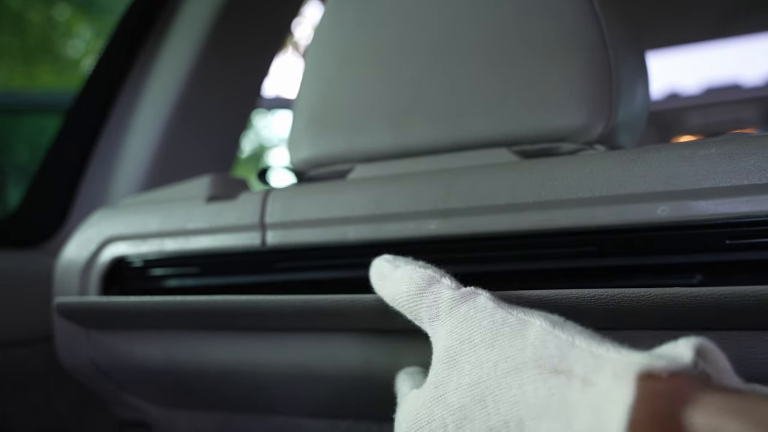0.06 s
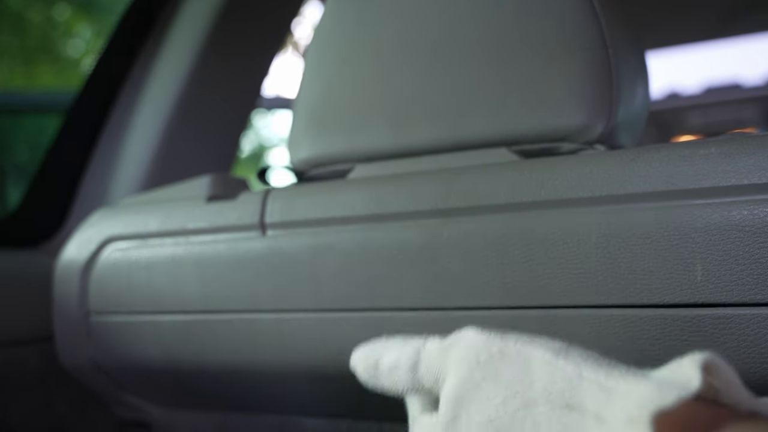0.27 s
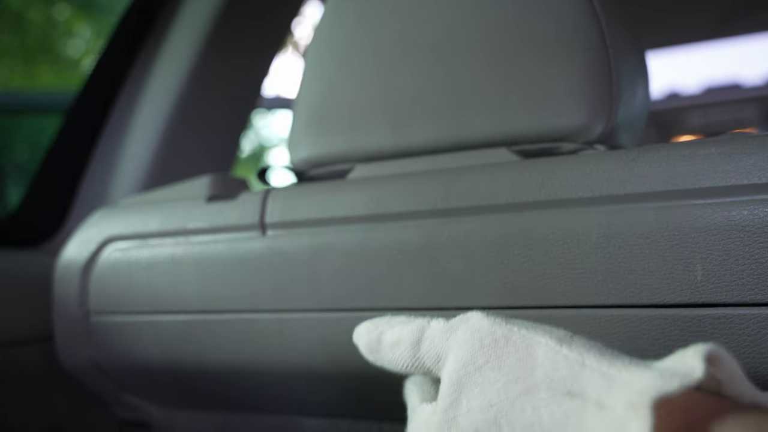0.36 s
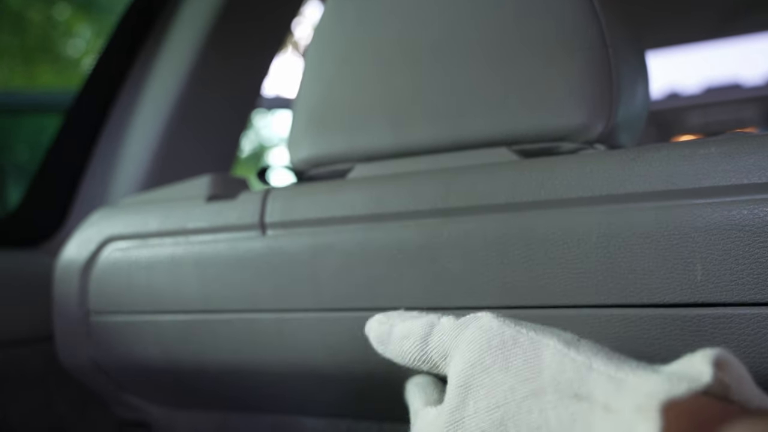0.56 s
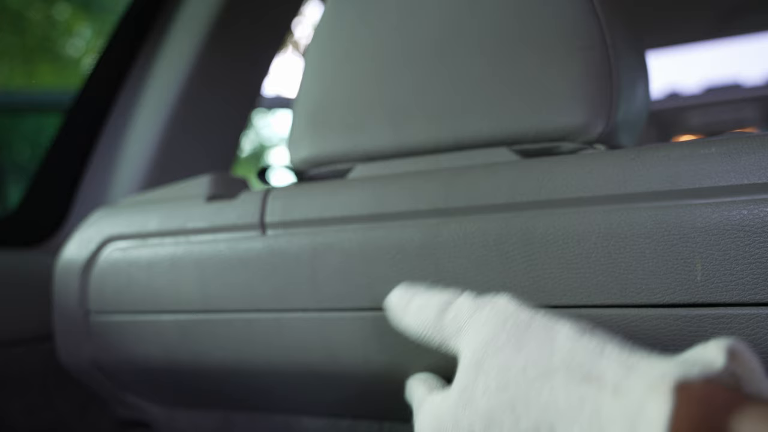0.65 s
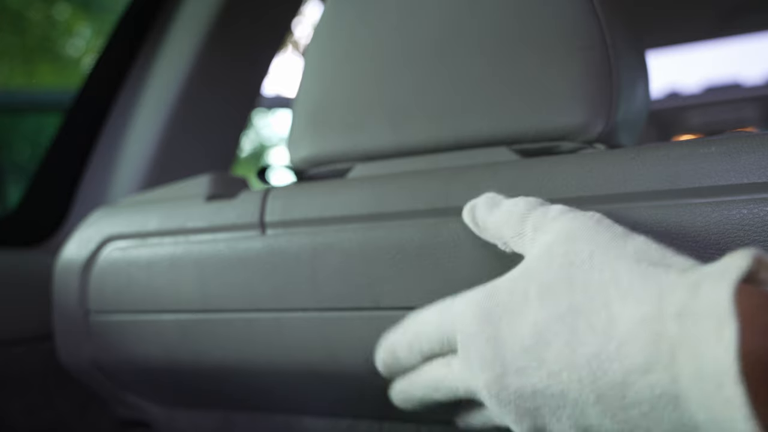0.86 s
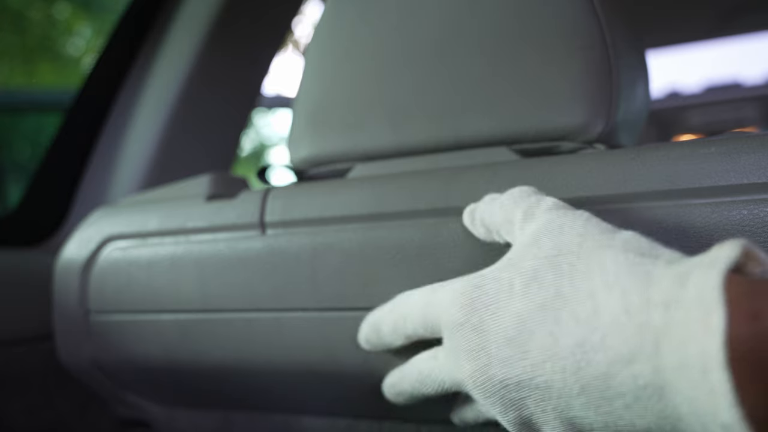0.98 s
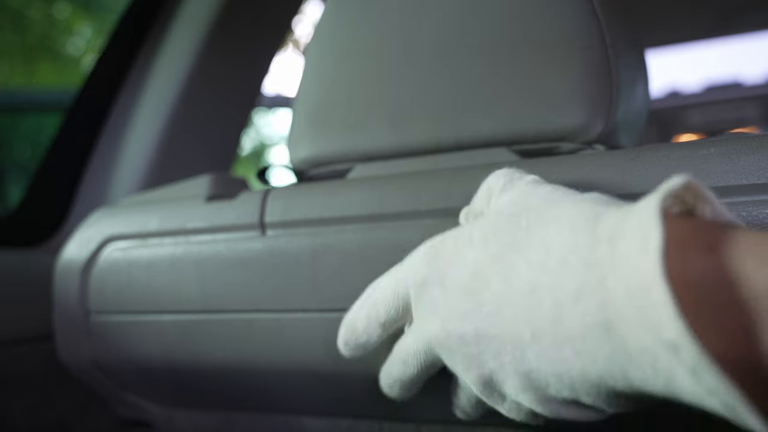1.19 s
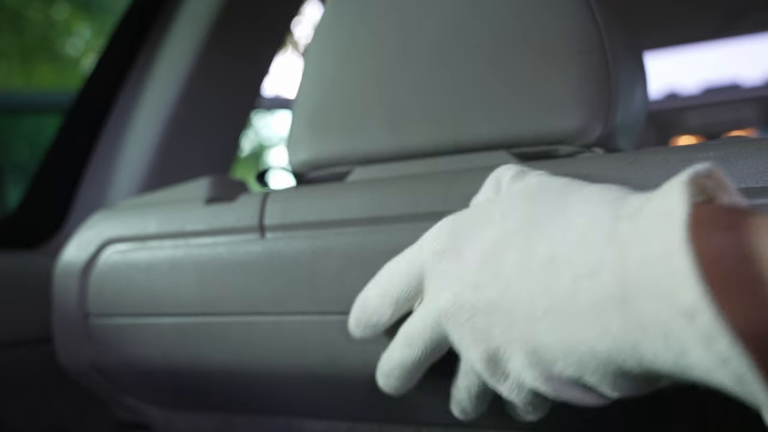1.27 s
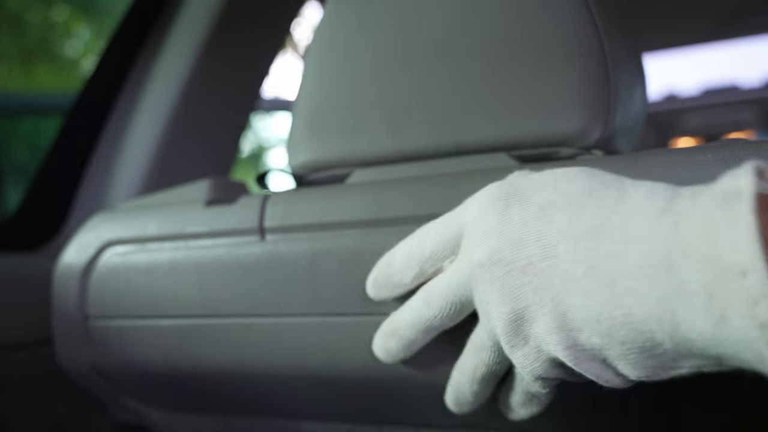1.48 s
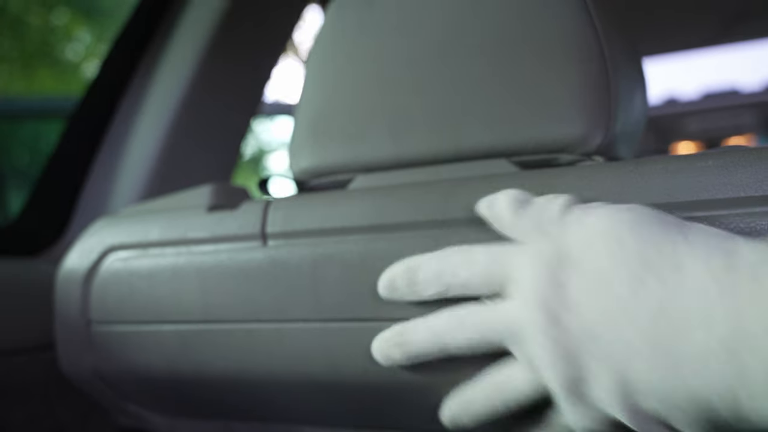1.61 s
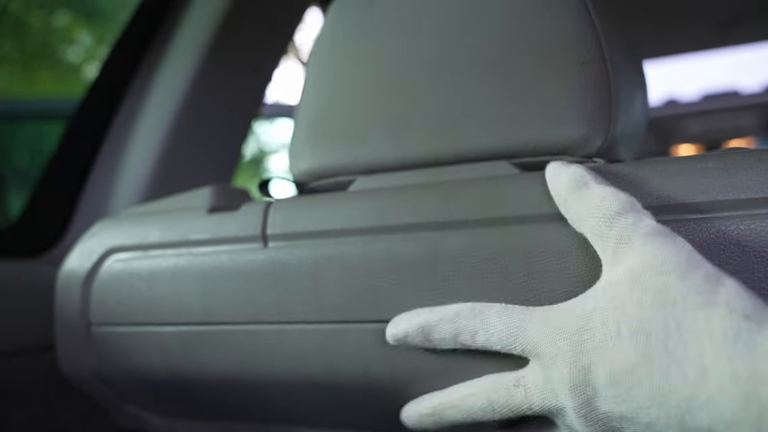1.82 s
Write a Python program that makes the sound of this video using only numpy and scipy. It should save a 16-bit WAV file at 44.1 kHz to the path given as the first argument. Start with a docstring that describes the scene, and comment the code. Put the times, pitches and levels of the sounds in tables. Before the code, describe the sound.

A plastic lid slams shut inside a car, followed by faint ticks of handled trim.

```python
"""Shutting a plastic lid in a car

Inside a parked car a gloved hand pushes a plastic panel lid shut: the latch rides over its catch,
the lid slams and shudders, and a spring rings on. The hand then presses and strokes the trim, which
sticks and slips in short dry ticks. A low rumble fills the cabin, and the cabin air booms as the
hand pushes and lets go. The close microphone overloads on the slam."""
import sys
import numpy as np
from scipy.fft import rfft, irfft, next_fast_len
from scipy.io import wavfile
from scipy.ndimage import uniform_filter1d, map_coordinates

SR = 44100
rng = np.random.default_rng(int(sys.argv[2]) if len(sys.argv) > 2 else 0)


def store_wav(level_fs):
    """Save 16-bit WAV to argv[1]."""
    pcm = np.round(np.clip(np.atleast_2d(level_fs), -1, 1) * 32767)
    wavfile.write(sys.argv[1], SR, pcm.T.astype(np.int16))


N = 81585

# How strong each noise is from low to high pitch: pitch_hz, relative_db
RUMBLE_COLOUR = [(12, -49), (20, -34.5), (44, -4), (180, 0), (362, -9.5), (439, -13), (705, -13.5),
                 (767, -8.5), (881, -10.5), (1580, -17.5), (2090, -22), (2270, -25.5), (15500, -59.5)]
ECHO_COLOUR = [(30, -9), (100, 8.5), (250, -3.5), (600, -18), (1500, -20), (4000, -25), (7000, -34.5),
               (15000, -39)]
RUB_COLOUR = [(40, -18), (110, 7), (300, 4.5), (600, -2), (1100, -7), (2400, -15), (4200, -22.5),
              (7000, -32.5), (15000, -42)]
HISS_COLOUR = [(500, -14), (2000, 4.5), (4000, 5), (8000, -4.5), (13000, -2.5), (16000, -5.5)]
TRIM_COLOUR = [(50, -31), (150, -3.5), (300, 6), (520, 5.5), (660, -2.5), (1000, 0.5), (1500, -1.5),
               (2050, -4.5), (2400, -3), (3000, -9.5), (3900, -4.5), (4700, -11), (5300, -11.5),
               (6600, -15), (7900, -15.5), (10000, -21), (15000, -29)]
LID_COLOUR = [(30, -18.5), (120, -7), (300, 0.5), (650, 6), (1300, -0.5), (2400, -5.5), (4200, -5.5),
              (6500, -12), (9500, -19.5), (14000, -18.5)]
SHUDDER_COLOUR = [(35, -29), (80, -14), (180, -10), (290, 0.5), (380, -7.5), (470, -1), (660, -14.5),
                  (830, 1.5), (1300, -17.5), (2250, -11.5), (2950, -21.5), (3800, -12.5), (5000, -26),
                  (15500, -48.5)]
# How long a noise takes to die away (a fade time is a drop of 60 dB): pitch_hz, fade_s
ECHO_FADES = [(100, 0.9), (1000, 1), (4000, 1), (12000, 0.31)]
TRIM_FADES = [(150, 0.087), (500, 0.069), (2000, 0.055), (5000, 0.031), (12000, 0.023)]
LID_FADES = [(100, 0.039), (600, 0.043), (3000, 0.071), (8000, .046), (15000, .037)]
# The tones each thing rings with when knocked: pitch_hz, relative_db, fade_s
AIR_TONES = [(110, -18.5, 0.13), (96.2, -38.5, .9), (119.5, -41, .8)]
FINGERTIP_TONES = [(213, -41.5, 0.08), (760, -35, 0.064), (1227, -46, 0.2)]
TRIM_TONES = [(244, -12.5, 0.094), (300, -11, 0.1), (419, -11, 0.044), (557, -12.5, 0.04),
              (745, -12, 0.062), (1025, -4, 0.027), (2415, -12.5, 0.042), (5196, -12, 0.027),
              (6140, -23, 0.029)]
HINGE_TONES = [(357, -33, 0.042), (900, -41.5, 0.06), (2580, -27, 0.013), (3794, -26, 0.04),
               (10640, -60, 0.075)]
SPRING_TONES = [(361, -34, 1.4), (721, -54, 1.4), (845, -49, .75), (1432, -55, 1.1), (1712, -54, 1.1),
                (2143, -51, 1.1), (2195, -51, .8), (3246, -46, .6)]
CATCH_TONES = [(294, -14, 0.15), (850, -18.5, 0.069), (968, -7, 0.032), (2262, -10, 0.055),
               (6180, -24.5, 0.057)]
LID_TONES = [(275, -17, .15), (306, -27, .14), (452, -33, .15), (555, -25, .14), (750, -24, .12),
             (834, -28, .19), (1040, -31, .14), (1161, -31, .16), (1389, -29, .12), (1561, -31, .16),
             (2291, -29, .13), (2461, -30, .12), (3850, -29, .09), (6205, -29, .075)]
# Booms of the cabin air: start_s, level_db
BOOMS = [(0.263, -0.5), (0.617, -15.5), (1.583, -5)]
# How loud the glove rubs and hisses over time: time_s, level_db
RUB_LEVELS = [(.77, -52), (.94, -52.5), (1.06, -40.5), (1.13, -43), (1.24, -37.5), (1.34, -41),
              (1.41, -48.5), (1.48, -39), (1.55, -42.5), (1.6, -32.5), (1.64, -35.5), (1.67, -35.5),
              (1.73, -46.5), (1.8, -38), (1.85, -45)]
HISS_LEVELS = [(.77, -73), (.795, -54.5), (.825, -51), (.86, -62), (.95, -64), (1.15, -103), (1.32, -70),
               (1.42, -67), (1.58, -69), (1.67, -47.5), (1.72, -52), (1.78, -51.5), (1.85, -53.5)]
# Slips of the trim's edge: start_s, relative_db, bass_db, treble_db, edge_pitch_hz, edge_db
TICKS = [(0.001, -35.5, -29, 4.5, 3830, -15), (0.7855, -39.5, 4, -2.5, 3880, -17),
         (0.9638, -35, -5, -11, 3590, -5), (0.9753, -36.5, 7, 7, 2680, 0), (0.997, -43, 1, 7, 3800, -2),
         (1.03, -27.5, -26, 3, 2640, -0.5), (1.053, -40.5, 4, -19, 2420, -8),
         (1.0673, -28.5, -6.5, -11.5, 3570, -14), (1.098, -33, 2, -3, 3540, -6),
         (1.108, -32.5, -0.5, 4.5, 3600, -3), (1.133, -43.5, 8, -13, 2660, -8),
         (1.156, -31, 5, 1.5, 3760, -16), (1.161, -26, 2.5, -6.5, 3750, -5),
         (1.184, -46, 4.5, -5, 2610, -8), (1.215, -35.5, -12, 2, 3780, -5),
         (1.22, -27.5, -8, -4.5, 3800, -14), (1.253, -32.5, -12, -0.5, 3960, -10),
         (1.261, -26, -10, -5, 3870, -22), (1.268, -34, 8.5, -4, 2650, -8), (1.292, -29, 1, -1, 2540, -16),
         (1.314, -35.5, 4, -9, 3700, -11), (1.324, -27.5, -13, -3, 3730, 1),
         (1.344, -34.5, -7, -12, 3680, -2), (1.365, -27, -1, -2.5, 4010, -0.5),
         (1.371, -29, 7, -7, 3530, -7), (1.4631, -28, 0.5, 2, 3990, 2), (1.483, -33.5, -4, -3, 3960, -1),
         (1.4889, -33.5, -19, 5, 3860, -1), (1.506, -34.5, -27, -4, 3900, 0),
         (1.523, -32, -0.5, -2.5, 3970, -5), (1.573, -44, -9, -10, 4050, -11),
         (1.5783, -22.5, 2.5, 1, 4160, -15), (1.612, -42, -20, -19, 2650, -9),
         (1.623, -35, -23, -18, 3900, -11), (1.641, -36.5, -22, -10, 2730, 1),
         (1.645, -37, 2, -8, 4400, -6), (1.6838, -32, 0, -3.5, 3620, -2)]
# Tiny squeaks as the trim lets go: start_s, level_db, pitch_hz
SQUEAKS = [(1.029, -23, 6970), (1.094, -35, 7400), (1.1534, -33, 7300), (1.2134, -31, 7600),
           (1.2527, -31, 7800), (1.464, -30, 7940), (1.488, -32, 7800), (1.505, -38, 8000),
           (1.523, -35.5, 7700)]
# Latch and lid contacts: start_s, level_db, bass_db, treble_db, rise_s, stretch (of rise and fade)
CONTACTS = [(.162, -39, -5.5, -5.5, .0001, 0.64), (0.1932, -34.5, -7.5, -12.5, 0.0034, 1.3),
            (0.1996, -21, -16, -0.5, 0.0022, 1.18), (0.204, -16, -12.5, 7.5, .0003, 0.38),
            (0.2276, -14, -11.5, -3.5, 0.0048, 1.44), (0.2297, -10, -21, 10, .0001, 0.51),
            (.2325, -19, -15, 3.5, .0005, 2.05), (0.378, -42, 0, -10, 0.0051, 0.69),
            (0.423, -41.5, -30, -13, 0.0043, 1.6)]
# The lid slams, then settles softly into its seat: start_s, level_db, bass_db, rise_s
LID_BLOWS = [(0.2293, 0, -15.5, 0.00026), (0.2537, -7, 7.5, .004)]

SLAM_S = 0.2285
BASS_HZ, TREBLE_HZ = 610, 6000  # where bass ends and treble begins


def amp(db):
    """Turn decibels into a gain."""
    return 10 ** (np.asarray(db) / 20)


def unit(x):
    """Scale a signal to an average power of 1."""
    return x / np.sqrt(np.mean(x ** 2) + 1e-20)


def along(points, hz):
    """Read between (pitch_hz, value) rows on a log pitch scale."""
    pitches, values = np.transpose(points)
    return np.interp(np.log(hz + 1), np.log(pitches + 1), values)


def since(start_s):
    """Seconds since start_s, for every sample."""
    return np.arange(N) / SR - start_s


def curve(rows):
    """Join (time_s, value) rows with straight lines."""
    return np.interp(since(0), *np.transpose(rows))


def wobble(rate):
    """A smooth curve through `rate` random values a second."""
    return map_coordinates(rng.standard_normal(4096), [since(0) * rate], mode="wrap")


def filtered(x, gain):
    """Turn each frequency up or down by gain(hz)."""
    size = next_fast_len(len(x) + 2048)
    return irfft(rfft(x, size) * gain(np.fft.rfftfreq(size, 1 / SR)), size)[:len(x)]


def noise(colour, size=N):
    """Noise shaped by a colour table, at power 1."""
    return unit(filtered(rng.standard_normal(size), lambda hz: amp(along(colour, hz))))


def add(out, x, start_s):
    """Mix x into out from start_s on."""
    i = round(start_s * SR)
    x = x[max(-i, 0):N - i]
    out[max(i, 0):][:len(x)] += x


def ring(tones, t, rise_s=0.00028):
    """A knocked object rings with fading tones from t = 0."""
    t = np.maximum(t, 0)
    ringing = sum(amp(db - 60 * t / fade_s) * np.sin(2 * np.pi * hz * t) for hz, db, fade_s in tones)
    return (1 - np.exp(-t / rise_s)) * ringing


def pulse(t, peak_s):
    """One bump that reaches 1 at peak_s and falls away."""
    age = np.maximum(t, 0) / peak_s
    return age * np.exp(1 - age)


def dying(x, fades, t):
    """Fade each octave of x at its own speed after t = 0."""
    centres = np.geomspace(60, 15360, 9)
    spectrum, hz = rfft(x), np.fft.rfftfreq(len(x), 1 / SR)
    out = np.zeros(len(x))
    for centre, pick in zip(centres, np.eye(len(centres))):
        octave = irfft(spectrum * along(np.c_[centres, pick], hz), len(x))
        out += octave * amp(-60 * np.maximum(t, 0) / along(fades, centre))
    return out


def snap(colour, fades, t, bass_db, treble_db, rise_s):
    """Hit plastic rings with many short tones that blur into noise; hardness sets bass and treble."""
    def tone_control(hz):
        bass = 1 / (1 + (hz / BASS_HZ) ** 4)
        treble = 1 - 1 / (1 + (hz / TREBLE_HZ) ** 8)
        return amp(bass_db * bass + treble_db * treble)

    x = filtered(noise(colour, size=len(t)), tone_control)
    local_power = np.abs(uniform_filter1d(x ** 2, size=256)) + 1e-20
    steady = x * np.sqrt(np.mean(x ** 2) / local_power)
    return dying(steady, fades, t) * np.exp(np.minimum(t, 0) / rise_s)


def cabin_rumble(level_db=-48):
    """A low rumble that wavers slightly."""
    return amp(level_db + 0.42 * wobble(13)) * noise(RUMBLE_COLOUR)


def cabin_booms():
    """The cabin air booms as the hand pushes and lets go."""
    return sum(amp(db) * ring(AIR_TONES, since(start_s), rise_s=0.01) for start_s, db in BOOMS)


def cabin_echo(level_db=-32.5):
    """The slam lingers in the cabin as a low, fading noise."""
    t = np.arange(2 * SR) / SR - SLAM_S
    echo = dying(noise(ECHO_COLOUR, size=len(t)), ECHO_FADES, t) * (t > 0)
    return amp(level_db) * echo[:N]


def glove():
    """A fingertip lands softly; the cloth rubs the panel in rough grains and hisses as it slides."""
    fingertip = ring(FINGERTIP_TONES, since(0.785))
    fade_in = np.clip(since(RUB_LEVELS[0][0]) / 0.016, 0, 1)
    rub = amp(curve(RUB_LEVELS)) * unit(amp(2.5 * wobble(130)) * noise(RUB_COLOUR))
    hiss = amp(curve(HISS_LEVELS)) * unit(amp(1.3 * wobble(270)) * noise(HISS_COLOUR))
    return fingertip + fade_in * rub + hiss


def trim_creaks(boost_db=3, edge_fade_s=0.036):
    """Pressed trim sticks and slips; each slip ticks and knocks the panel, and some also squeak."""
    out, t = np.zeros(N), np.arange(-256, 7936) / SR
    for start_s, db, bass_db, treble_db, edge_hz, edge_db in TICKS:
        tick = snap(TRIM_COLOUR, TRIM_FADES, t, bass_db - 1, treble_db + 1, rise_s=0.0005)
        # no two slips ring quite alike
        panel_tones = [(hz * (1 + 0.014 * rng.normal()), tone_db + 2 * rng.normal(), fade_s)
                       for hz, tone_db, fade_s in TRIM_TONES]
        edge_tones = [(edge_hz * (1 + 0.022 * rng.normal()), edge_db, edge_fade_s) for _ in range(2)]
        panel = ring(panel_tones, t, rise_s=0.0015)
        edge = ring(edge_tones, t) / 2
        add(out, amp(db + boost_db) * (tick + edge + panel), start_s + t[0])
    for start_s, db, hz in SQUEAKS:
        squeak = pulse(t, peak_s=0.00028) * np.sin(2 * np.pi * hz * t)
        add(out, amp(db) * squeak, start_s + t[0])
    return out


def hinge():
    """The hinge clinks as the lid starts to move."""
    return ring(HINGE_TONES, since(0.00058))


def spring():
    """Shaken by the slam, a spring rings on."""
    return ring(SPRING_TONES, since(SLAM_S))


def latch():
    """The latch scrapes over its catch, clicks home and settles; every contact rings the catch."""
    out, t = np.zeros(N), np.arange(-2048, 10240) / SR
    for start_s, db, bass_db, treble_db, rise_s, stretch in CONTACTS:
        crack = snap(LID_COLOUR, LID_FADES, t / stretch, bass_db, treble_db, rise_s)
        add(out, amp(db) * (crack + ring(CATCH_TONES, t)), start_s + t[0])
    return out


def lid_shudder(level_db=-26, rise_s=0.006, hold_s=0.028, fade_s=0.044):
    """The shut lid chatters briefly against its seat."""
    t = since(0.252)
    swell = np.exp(np.minimum(t, 0) / rise_s)
    fade = amp(-60 * np.maximum(t - hold_s, 0) / fade_s)
    return amp(level_db + 0.6 * wobble(350)) * swell * fade * noise(SHUDDER_COLOUR)


def lid_knock(loose_hz=384, tight_hz=811, squeeze_s=0.004, rise_s=0.00083, fade_s=0.013):
    """The lid hits its frame with a dead knock whose pitch rises as the seal is squeezed."""
    t = since(SLAM_S)
    age = np.maximum(t, 0)
    pitch_hz = tight_hz + (loose_hz - tight_hz) * np.exp(-age / squeeze_s)
    loudness = amp(3.5 - 60 * age / fade_s) * (1 - np.exp(-age / rise_s))
    return loudness * np.sin(2 * np.pi * np.cumsum(pitch_hz * (t > 0)) / SR)


def lid_slam():
    """The lid knocks shut, squeezes a puff of air out of the gap and rings from each blow."""
    puff = amp(-7) * pulse(since(SLAM_S), peak_s=0.00064)
    ringing = np.zeros(N)
    for start_s, db, bass_db, rise_s in LID_BLOWS:
        tones = [(hz, tone_db + bass_db / (1 + (hz / BASS_HZ) ** 4), fade_s)
                 for hz, tone_db, fade_s in LID_TONES]
        ringing += amp(db) * ring(tones, since(start_s), rise_s)
    return ringing - (puff + lid_knock())


def scene():
    """The cabin, the hand and the lid, mixed into one channel."""
    cabin = cabin_rumble() + cabin_booms() + cabin_echo()
    hand = glove() + trim_creaks()
    lid = hinge() + spring() + latch() + lid_shudder() + lid_slam()
    return (cabin + hand + lid)[None]


def record(dry):
    """The overloaded microphone rounds off the loudest peaks and cuts the very highest treble."""
    ceiling, top_hz = 0.75, 15900
    rounded = dry[0] / (1 + np.abs(dry[0] / ceiling) ** 4) ** (1 / 4)
    return filtered(rounded, lambda hz: 1 / (1 + (hz / top_hz) ** 200))[None]


dry = scene()
out = record(dry)
store_wav(out)
```